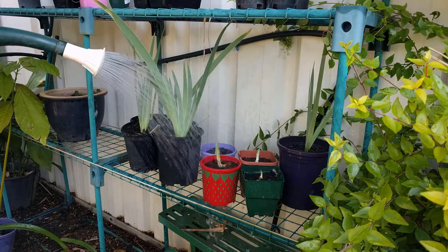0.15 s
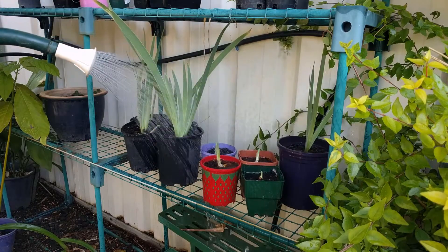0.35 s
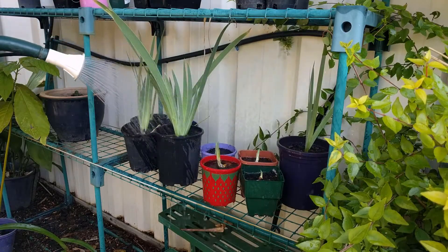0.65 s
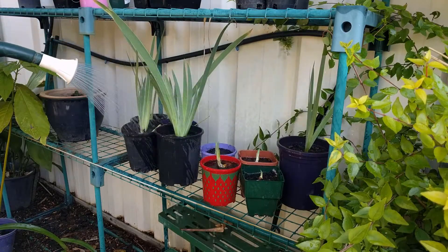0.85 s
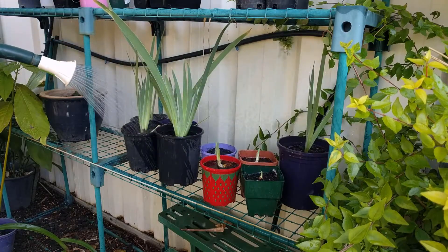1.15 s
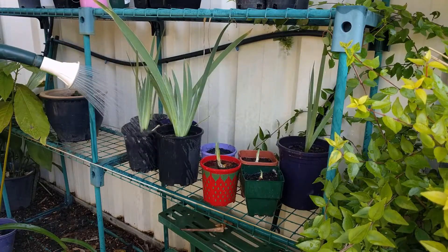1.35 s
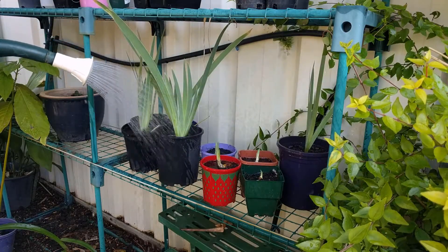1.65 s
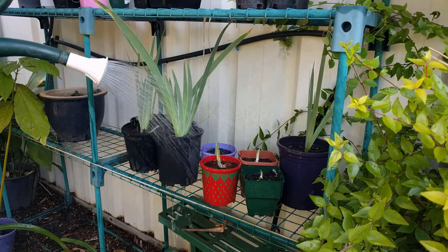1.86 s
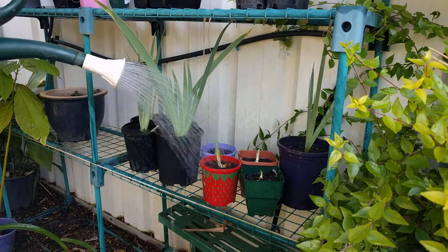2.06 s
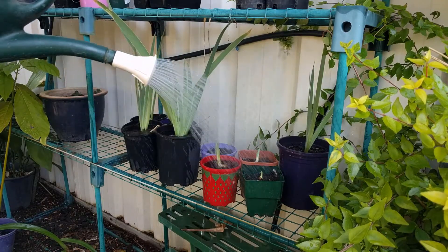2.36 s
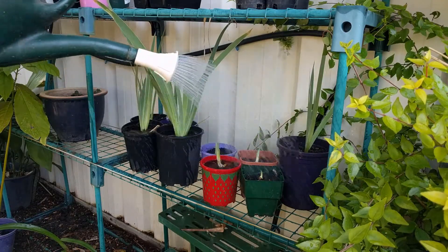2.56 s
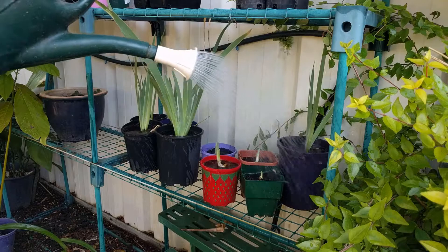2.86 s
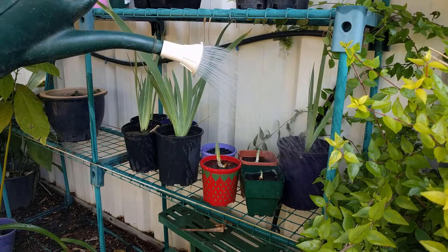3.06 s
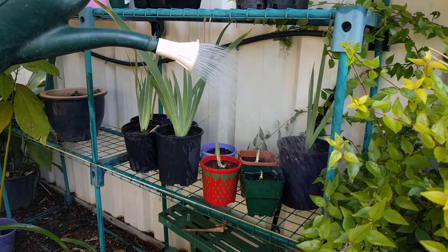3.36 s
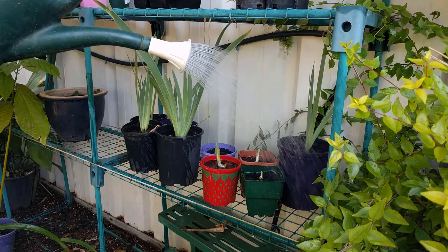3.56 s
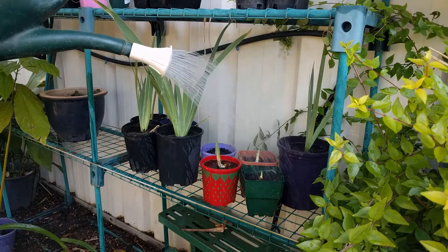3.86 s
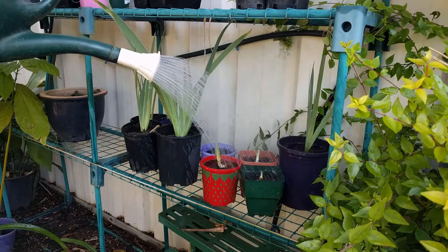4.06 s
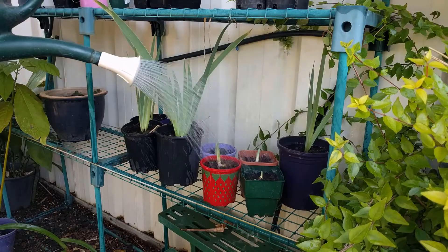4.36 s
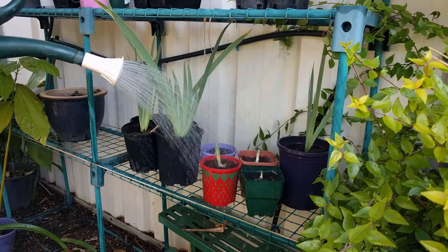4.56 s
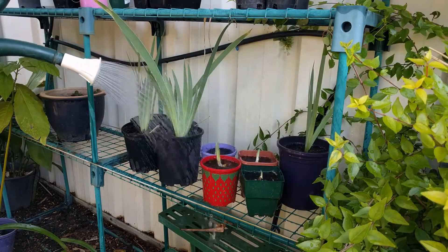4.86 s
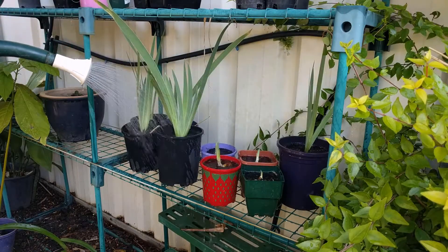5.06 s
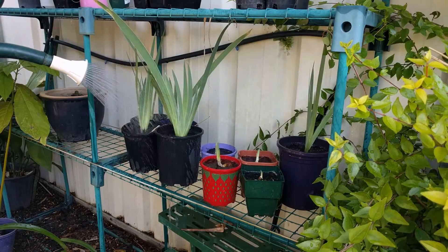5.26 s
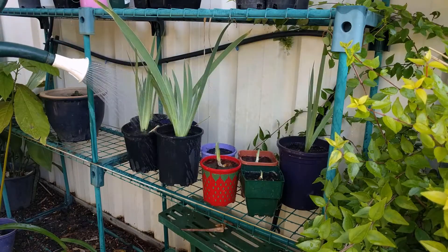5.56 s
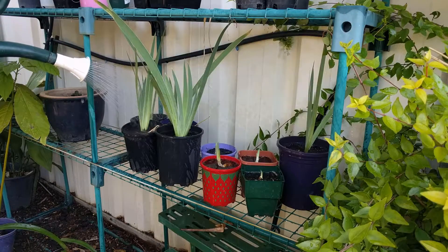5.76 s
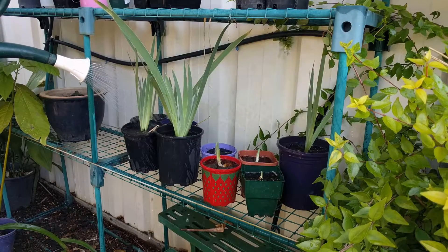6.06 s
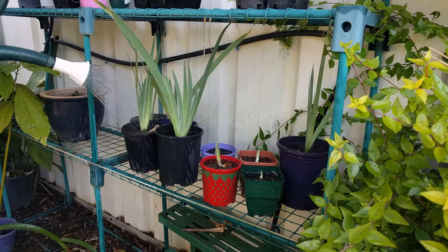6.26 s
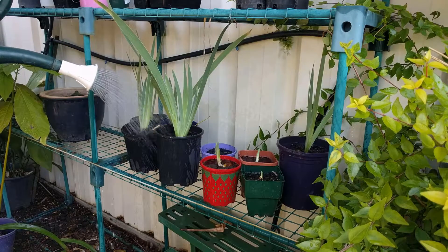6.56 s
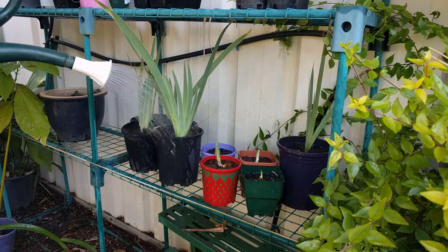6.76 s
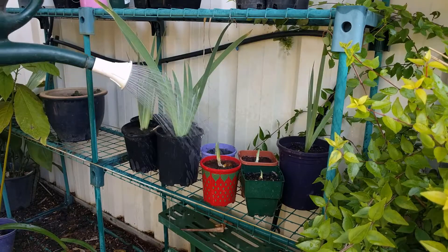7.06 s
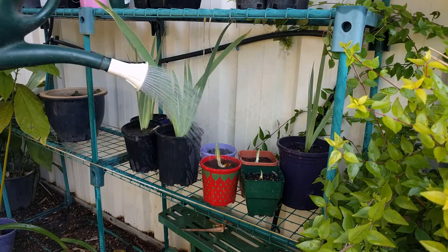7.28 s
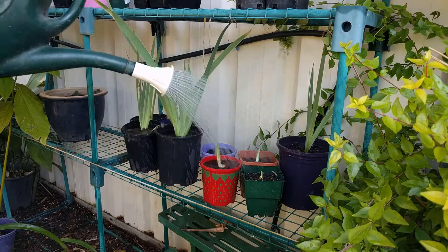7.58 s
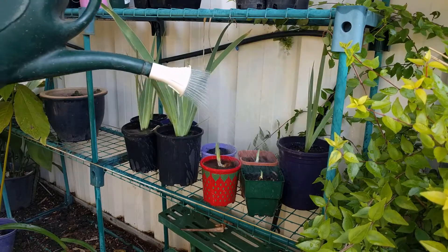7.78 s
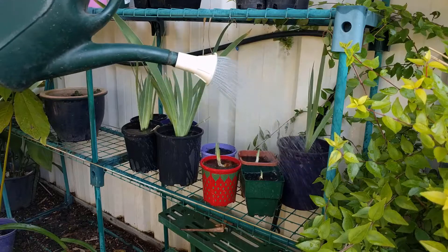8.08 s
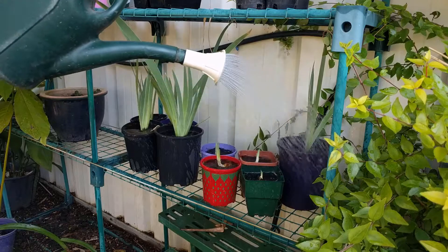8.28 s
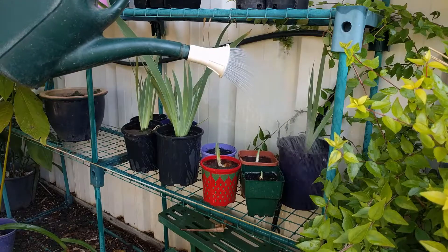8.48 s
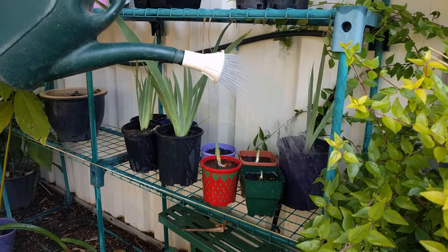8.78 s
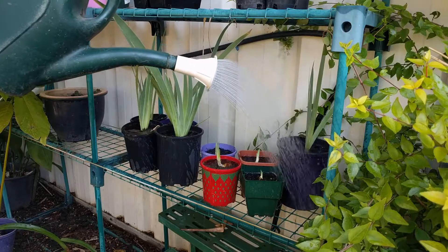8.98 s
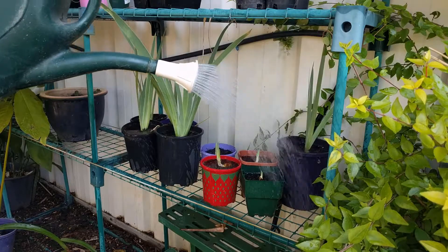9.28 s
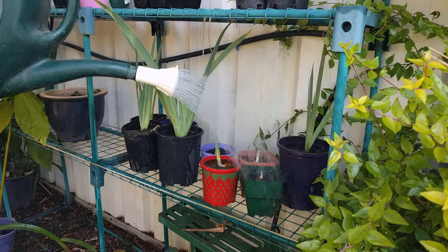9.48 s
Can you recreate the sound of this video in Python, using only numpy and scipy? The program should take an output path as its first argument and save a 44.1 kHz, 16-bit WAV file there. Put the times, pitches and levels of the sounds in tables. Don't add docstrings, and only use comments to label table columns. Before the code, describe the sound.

Water from a watering can is already sprinkling potted plants in a quiet garden. The fine, bright patter is continuous and grainy, made of countless short drop ticks on leaves, softer ones on soil and a thin high mist. Sharp smacks cluster at 0.5-0.7 s, with a soft dull shift of water in the can near 0.9. The spray thins until about 2, strengthens near 2.5, and a longer splash lands at 2.9. It grows denser around 4.2-4.7 with crisp heavy drops, scatters more smacks at 5.4-5.8, then sinks near 6.4. It swells again from 6.8 to 8, dips around 8.4, and finishes with the loudest, thickest spatter from 8.7, peaking just after 9, with a brief slosh near 9.3. Faint low hum and distant town murmur stay underneath. The sound is close, dry, mono and treble-heavy, still spraying at the end.

```python
import sys
import numpy as np
from scipy import signal
from scipy.fft import rfft, irfft
from scipy.io import wavfile

SR = 44100
rng = np.random.default_rng(int(sys.argv[2]) if len(sys.argv) > 2 else 0)


def waveform_to_disk(signal):
    frames = np.transpose(np.atleast_2d(signal))
    scaled = np.clip(frames, -1, 1) * 32767
    samples = np.round(scaled).astype(np.int16)
    wavfile.write(sys.argv[1], SR, samples)


def natural_amplitude(level_db):
    exponent = np.asarray(level_db, float) / 20
    return 10 ** exponent


N = 424638


def rms_one(x):
    return x / np.sqrt(np.mean(x ** 2) + 1e-20)


def band(x, low_hz, high_hz):
    sos = signal.butter(2, [low_hz, high_hz], "band", fs=SR, output="sos")
    return signal.sosfilt(sos, x + 1e-18)


def resonance(x, hz, width_hz):
    r = np.exp(-np.pi * width_hz / SR)
    numerator = [(1 - r * r) / 2, 0, (r * r - 1) / 2]
    denominator = [1, -2 * r * np.cos(2 * np.pi * hz / SR), r * r]
    return signal.lfilter(numerator, denominator, x + 1e-18)


def drift(rate_hz):
    r = np.exp(-80 * np.pi * rate_hz / SR)
    steps = rng.standard_normal(N // 40 + 2002)
    slow = signal.lfilter([1], [1, -2 * r, r * r], steps)[2000:]
    return np.interp(np.arange(N) / 40, np.arange(len(slow)), rms_one(slow))


def mic(x):
    return x + natural_amplitude(14) * resonance(x, 7057, width_hz=954)


REBOUND_S, REBOUND_DB = 0.010, -4
SPOTS = 12


def patter(pulse, low_hz, high_hz, tilt_db, per_s, spread_db, cycles, clump_db, patchy_db, smooth):
    luck = rng.random((6, N))
    crowding = np.clip(0.8 * pulse + 0.6 * drift(20), -2.5, 1.6)
    at = np.flatnonzero(luck[0] < per_s * natural_amplitude(clump_db * crowding) / SR)
    sizes = natural_amplitude(spread_db * np.minimum(-np.log(luck[1, at] + 1e-9), 3))
    spots = (luck[2, at] * SPOTS).astype(int)
    hits = np.zeros((SPOTS, N + 4000))
    hits[spots, at] = sizes
    for share in luck[3:, at]:
        landing = at + 1 + (share * REBOUND_S * SR).astype(int)
        hits[spots, landing] -= sizes * natural_amplitude(REBOUND_DB - 4.0 * share)
    hits = rms_one(hits[:, :N]) / np.sqrt(SPOTS)
    far = rng.standard_normal(N)
    patches = natural_amplitude(patchy_db * drift(4.3))
    out = 0
    for k, hz in enumerate(np.geomspace(low_hz, high_hz, SPOTS)):
        struck = (-1) ** k * hits[k] + smooth * np.roll(far, N // SPOTS * k)
        rung = resonance(resonance(struck, hz, hz / cycles), hz, hz / cycles)
        tilt = natural_amplitude(tilt_db * np.log2(hz / low_hz))
        out = out + tilt * np.roll(patches, N // 7 * (k // 2)) * rung
    return rms_one(out)


# [t/s, spray level/dB, turn towards bare soil/dB, reach along the shelf/0-1]
ROSE_SWEEP = [(0.0, -41.5, 1, 0.8), (0.5, -40.5, 0.5, 0.2), (0.9, -42.5, 1, 0), (1.61, -43, 1, 0.34),
              (2.47, -40, -0.5, .3), (3.0, -42.5, 0.5, 0.85), (3.67, -41, 0, 0.5), (4.4, -38, 0.5, 0.5),
              (5.15, -41.5, -1.5, 0), (6.4, -43.5, 3.5, 0.34), (6.84, -38.5, -1.5, 0), (7.08, -42.5, 1, .2),
              (7.43, -39, 2, 0.34), (7.97, -39, 2, .7), (8.35, -44.5, -2, 0.6), (8.74, -41, -0.5, .3),
              (9.12, -42.5, 1, 0.9), (9.5, -36, -2, 0.26)]
SOIL_BELOW_DB, SOIL_FOLLOWS = -13.5, 0.73
MIST_BELOW_DB, MIST_FOLLOWS, MIST_NEAR_DB = -8.0, 0.9, 5


def spray():
    s, *controls = np.transpose(ROSE_SWEEP)
    leaves_db, turn_db, reach = [np.interp(np.arange(N) / SR, s, c) for c in controls]
    mean_db = leaves_db.mean()
    swing_db = leaves_db - mean_db
    soil_db = mean_db + SOIL_BELOW_DB + SOIL_FOLLOWS * swing_db + turn_db
    mist_db = mean_db + MIST_BELOW_DB + MIST_FOLLOWS * swing_db + MIST_NEAR_DB * reach
    pulse = drift(25)
    leaves = patter(pulse, 4270, 9160, tilt_db=0.5, per_s=1800, spread_db=4.0, cycles=4.85,
                    clump_db=3.5, patchy_db=1.0, smooth=0.14)
    soil = patter(pulse, 1493, 3820, tilt_db=4.0, per_s=800, spread_db=1.5, cycles=4.3,
                  clump_db=4.0, patchy_db=2.0, smooth=0.17)
    mist = patter(pulse, 9800, 18100, tilt_db=-9.0, per_s=2500, spread_db=8.5, cycles=3.1,
                  clump_db=3.5, patchy_db=1.1, smooth=0.19)
    return natural_amplitude(leaves_db - 9.5) * leaves + natural_amplitude(soil_db - 2.5) * soil + natural_amplitude(mist_db - 1.5) * mist


# [f/Hz, spectral level/dB]
MURMUR = [(21, -37), (40, -2.5), (97, -0.5), (150, -10), (200, -7.5), (357, -12), (450, -10), (588, -14),
          (900, -12.5), (1200, -14), (2000, -20.5)]
# [f/Hz, bandwidth/Hz, rms level/dB]
MACHINES = [
    (93.4, 22, -60),
    (135, 19, -71),
    (458, 17, -73),
    (522, 9.8, -77),
    (711, 77, -71),
]


def town():
    hz = np.fft.rfftfreq(N, 1 / SR)
    knot_hz, knot_db = np.transpose(MURMUR)
    colour = natural_amplitude(np.interp(np.log(hz + 1), np.log(knot_hz), knot_db))
    absorbed = colour / (1 + (hz / 2800) ** 2)
    murmur = rms_one(irfft(rfft(rng.standard_normal(N)) * absorbed, N))
    out = natural_amplitude(-56.5 + 0.78 * drift(0.8)) * murmur
    for hum_hz, width_hz, db in MACHINES:
        hum = resonance(rng.standard_normal(N), hum_hz, width_hz)
        out += natural_amplitude(db) * rms_one(resonance(hum, hum_hz, width_hz))
    phase = 2 * np.pi * 50.0 * np.arange(N) / SR + 0.53 * drift(1.5)
    return out + natural_amplitude(-64 + 1.0 * drift(0.77)) * np.sqrt(2) * np.sin(phase)


# [t/s, half length/s, level/dB, low f/Hz, high f/Hz]
SWELLS = [
    (0.087, 0.098, -61.5, 200, 348),
    (0.89, 0.2, -57.5, 188, 476),
    (9.294, 0.042, -54.5, 298, 3000),
]


def slosh():
    t, noise = np.arange(N) / SR, rng.standard_normal(N)
    out = np.zeros(N)
    for s, half, db, low_hz, high_hz in SWELLS:
        swell = np.exp(-((t - s) / half) ** 2)
        out += natural_amplitude(db) * swell * rms_one(band(noise, low_hz, high_hz))
    return out


def width(db, hz):
    return 2180 * np.exp(0.035 * (db + 35.5)) * (hz / 6000) ** 0.86


def ring(hz):
    return 0.026 * (hz / 6000) ** -0.53


PLINK, PLINK_CYCLES = 0.68, 7.4
SECOND_NOTE, NOTE_GAP = 0.23, 0.44


def impacts(rows):
    size = 3000
    t, out = np.arange(size) / SR, np.zeros(N + size)
    for (s, db, hz, width_hz, t60), luck in zip(rows, rng.random((len(rows), 2, size))):
        smack = natural_amplitude(-60 * t / max(t60, 0.003))
        spatter = natural_amplitude(-3.5 - 60 * t / 0.061) * (luck[0] < 0.08) * 3.1
        blow = (2 * luck[1] - 1) * (smack + spatter)
        blow[0] = 2.2
        blow += PLINK * np.sin(2 * np.pi * hz * t) * np.exp(-np.pi * hz * t / PLINK_CYCLES)
        low_hz = np.hypot(hz, 0.52 * width_hz) - 0.56 * width_hz
        colour = signal.butter(2, [low_hz, hz * hz / low_hz], "band", fs=SR, output="sos")
        burst = signal.sosfilt(np.vstack([colour, colour]), blow)
        second_hz = hz * np.exp(NOTE_GAP * (luck[0, -1] - 0.5) * width_hz / hz)
        first_note = 0.31 * resonance(burst, hz, 0.12 * width_hz)
        second_note = SECOND_NOTE * resonance(burst, second_hz, 0.091 * width_hz)
        burst += first_note + second_note
        i = round(s * SR) - 12
        peak = np.max(np.abs(mic(burst[:300])))
        out[i:i + size] += natural_amplitude(db + 0.05) * burst / peak
    return out[:N]


def plain_drops(table):
    return impacts([(s, db, hz, width(db, hz), ring(hz)) for s, db, hz in table])


def strays():
    low_hz, high_hz = 3160, 12900
    when, spot, size = rng.random((80, 3)).T
    hz = low_hz * (high_hz / low_hz) ** spot
    loss_db = 16 * np.maximum(np.log2(5000 / hz), 0)
    db = -33 - (2 * size - 1) - loss_db
    return plain_drops(list(zip(0.01 + when * (N / SR - 0.01), db, hz)))


# [t/s, peak level/dB, f/Hz]
LEAF_DROPS = [(0.0274, -26, 6050), (0.0544, -22, 6640), (0.1967, -22, 8400), (0.2935, -26, 5760),
              (0.448, -23, 6480), (1.1104, -25, 5750), (1.1415, -25, 8420), (1.225, -28, 6500),
              (1.9606, -26, 6550), (2.629, -21, 8700), (3.562, -26, 6100), (3.599, -23, 6500),
              (3.7537, -24, 6950), (4.2282, -19, 7200), (4.5023, -21, 7100), (4.7206, -25, 5990),
              (4.8912, -22, 6900), (5.1042, -25.5, 7300), (5.5937, -25.5, 7900), (6.3427, -26, 8800),
              (6.3987, -26, 7950), (6.6324, -26.5, 7210), (6.794, -22, 6750), (7.035, -23, 7100),
              (7.1403, -20, 6360), (7.4032, -22, 6000), (7.598, -22, 8800), (8.142, -24, 5900),
              (8.9655, -20.5, 6430), (9.026, -22, 6940)]


def leaf_drops():
    return plain_drops(LEAF_DROPS)


# [t/s, peak level/dB, f/Hz]
WIRE_TICKS = [(0.175, -25, 9770), (0.447, -23.5, 10600), (0.51, -27, 9740), (0.7196, -29, 11330),
              (1.5942, -27, 8870), (1.7594, -29, 13990), (2.661, -24, 9890), (3.118, -29, 10200),
              (3.1689, -26, 12520), (3.271, -30, 10200), (3.5856, -30, 11290), (3.8574, -28, 10600),
              (4.1235, -25, 11500), (4.7194, -25, 10420), (4.8587, -25, 9190), (5.2346, -27, 10830),
              (6.027, -24, 9180), (6.2558, -31, 13070), (6.766, -27, 11700), (7.3358, -24, 14550),
              (8.387, -30, 12790), (8.428, -30, 10830), (9.03, -24, 12000), (9.125, -20, 9500)]


def wire_ticks():
    return impacts([(s, db, hz, 0.77 * width(db, hz), ring(hz)) for s, db, hz in WIRE_TICKS])


# [t/s, peak level/dB, f/Hz, bandwidth/Hz]
HEAVY_DROPS = [(0.4975, -17, 7560, 7310), (0.6171, -17, 5750, 7310), (0.6797, -19, 7060, 3500),
               (0.6858, -18, 8500, 7000), (1.004, -20.5, 6000, 3290), (2.104, -20, 5350, 3630),
               (2.3074, -18.5, 7540, 2940), (2.774, -23.5, 6040, 4090), (2.8741, -18.5, 7200, 2600),
               (3.338, -19, 4940, 3800), (3.5063, -18.5, 5350, 4780), (3.9132, -22.5, 4760, 2940),
               (4.265, -18, 8800, 4090), (4.3054, -20, 6760, 2710), (4.5666, -20.5, 7190, 2480),
               (4.734, -16.5, 6710, 7310), (5.428, -17.5, 4900, 4200), (5.5583, -18, 7400, 5240),
               (5.767, -18, 7550, 6390), (8.72, -20, 7900, 5580), (8.744, -16, 6530, 6440),
               (8.9038, -19, 6370, 2020), (9.0539, -11.5, 7850, 5500), (9.1018, -17.5, 6570, 2400),
               (9.2093, -16.5, 6600, 4220), (9.2287, -18, 6440, 2940), (9.2883, -20.5, 9800, 3860),
               (9.3375, -18, 6500, 2480), (9.438, -14, 6250, 1910), (9.599, -16, 6200, 2630)]


def smacks():
    return impacts([(s, db, hz, width_hz, 0.76 * ring(hz)) for s, db, hz, width_hz in HEAVY_DROPS])


# [t/s, peak level/dB, f/Hz]
MORE_DROPS = [(0.8857, -31, 7200), (0.952, -25.5, 7790), (1.161, -30, 4900), (1.2445, -42, 3620),
              (2.6185, -26, 7200), (2.6491, -29, 9200), (2.8883, -29, 6620), (2.9915, -38, 6340),
              (2.9973, -45, 3830), (3.042, -32, 5730), (3.462, -31, 4600), (4.2822, -26, 8650),
              (5.0143, -38, 4260), (5.2333, -27, 6900), (5.89, -28.5, 7940), (6.22, -38, 8800),
              (6.3939, -39, 4450), (7.056, -32.5, 5330), (7.1812, -30, 4900), (7.2698, -26, 7400),
              (8.0448, -26, 8990), (8.5984, -44, 3900), (8.6718, -27, 7140), (9.135, -24, 6360),
              (9.2565, -27, 7000), (4.184, -25, 7200), (4.236, -22, 7000), (4.2548, -37, 2950),
              (6.905, -44, 2400), (9.479, -31, 4800)]


def more_drops():
    return plain_drops(MORE_DROPS)


# [t/s, peak level/dB, f/Hz]
SOIL_DROPS = [(1.1, -32, 5400), (1.3553, -44.5, 2130), (1.366, -29, 5000), (1.712, -27, 5030),
              (1.7783, -37, 2660), (1.924, -45.5, 1260), (2.222, -29, 4800), (2.6294, -31, 5410),
              (2.9246, -26.5, 3910), (3.131, -45, 2300), (3.6384, -23, 4700), (3.791, -24, 5430),
              (4.0683, -27, 5260), (4.2714, -21.5, 4770), (4.494, -27.5, 3900), (4.7731, -35.5, 3900),
              (5.361, -48, 2870), (6.027, -29, 5430), (6.1308, -34, 2950), (6.353, -27.5, 5100),
              (6.6984, -28.5, 5400), (6.9663, -36.5, 2320), (7.851, -29, 4250), (7.8964, -27, 4260),
              (8.0114, -44, 1330), (8.379, -30, 5500), (8.4127, -28.5, 5230), (8.565, -33, 4130),
              (9.4096, -41.5, 3000), (9.5595, -24, 4500)]


def plops():
    return plain_drops(SOIL_DROPS)


# [t/s, peak level/dB, f/Hz, bandwidth/Hz, 60 dB decay/s]
RUN_OFF = [
    (2.918, -19, 5100, 3200, 0.14),
    (9.2345, -21.5, 6500, 2100, 0.023),
    (2.107, -30.5, 4700, 1000, 0.044),
    (8.752, -27, 4700, 2600, 0.039),
]


def splashes():
    return impacts(RUN_OFF)


def scene():
    water = spray() + slosh() + strays() + leaf_drops() + wire_ticks()
    water += smacks() + more_drops() + plops() + splashes()
    return np.tile(water + town(), (2, 1))


def low_pass(x):
    return signal.sosfilt(signal.butter(12, 16960, fs=SR, output="sos"), x)


def record(dry):
    bass_cut = signal.butter(6, 42, "high", fs=SR, output="sos")
    top_cut = signal.ellip(10, 0.5, 60, 15850, fs=SR, output="sos")
    heard = signal.sosfilt(np.vstack([bass_cut, top_cut]), mic(dry))
    return low_pass(heard - 0.0015)


dry = scene()
out = record(dry)
waveform_to_disk(out)
```